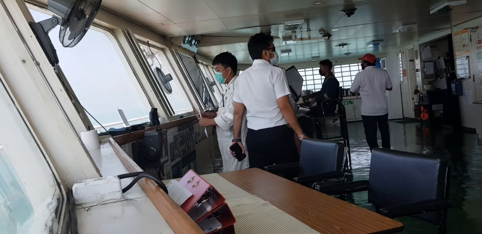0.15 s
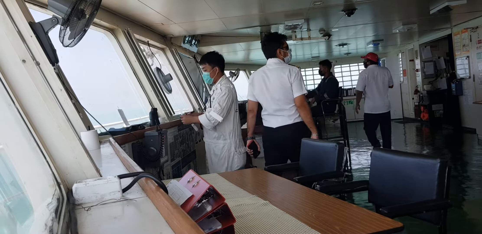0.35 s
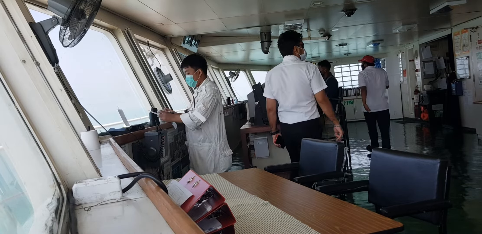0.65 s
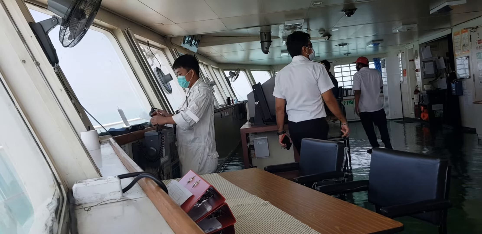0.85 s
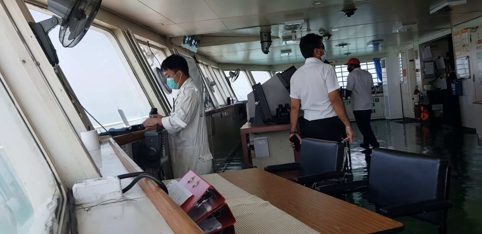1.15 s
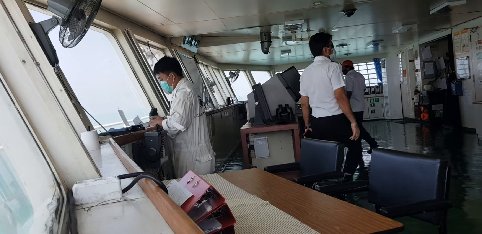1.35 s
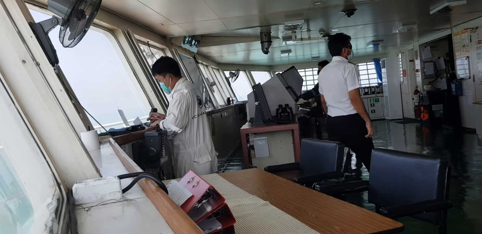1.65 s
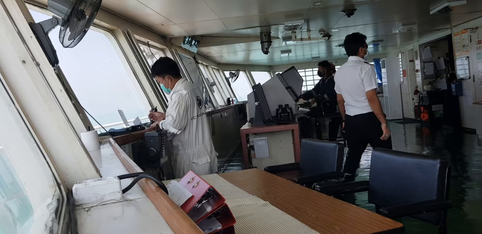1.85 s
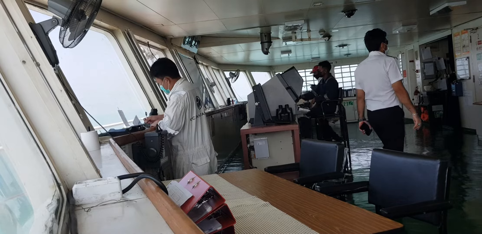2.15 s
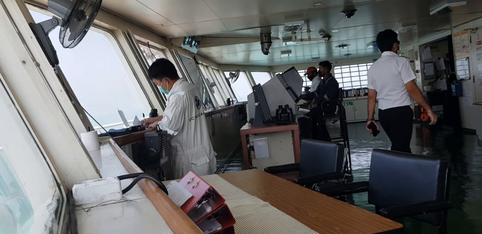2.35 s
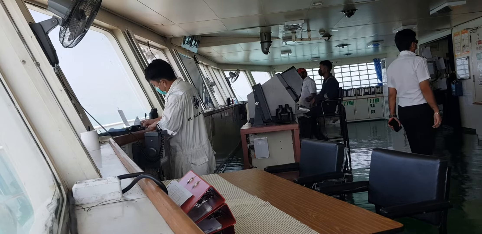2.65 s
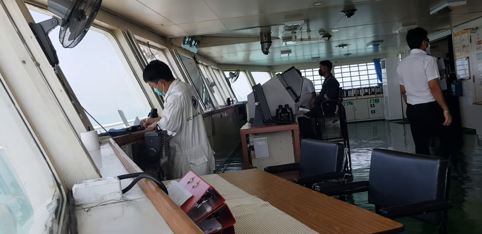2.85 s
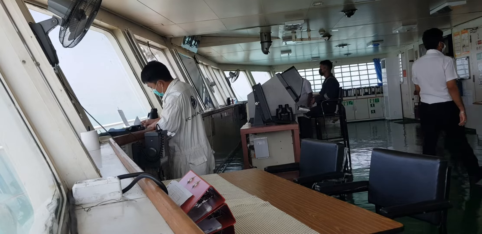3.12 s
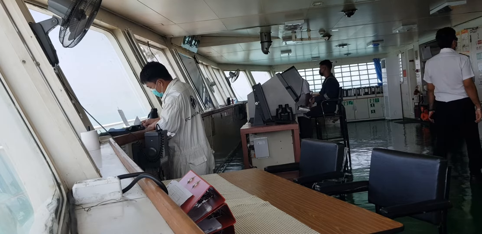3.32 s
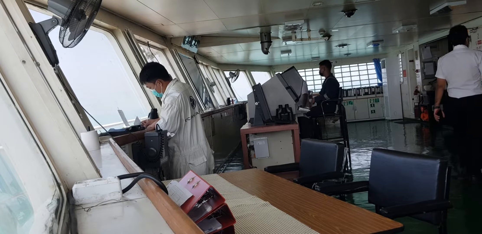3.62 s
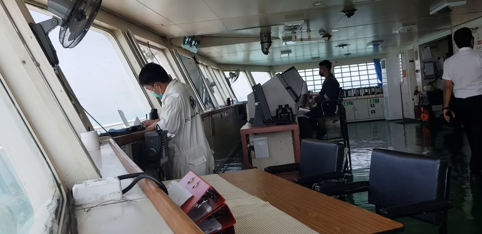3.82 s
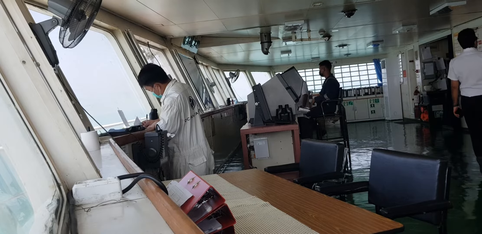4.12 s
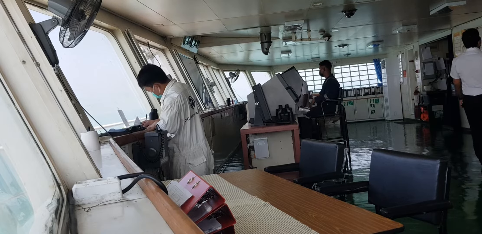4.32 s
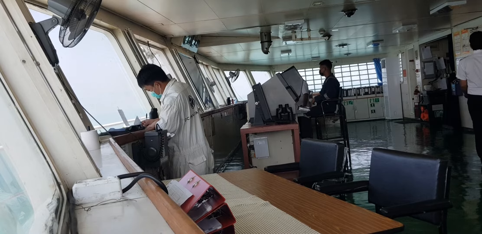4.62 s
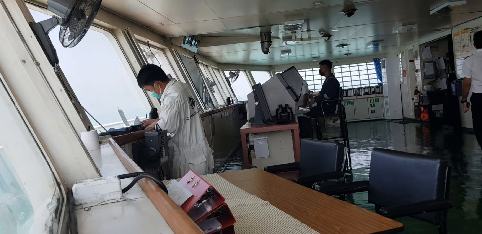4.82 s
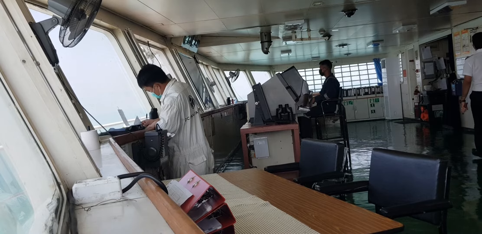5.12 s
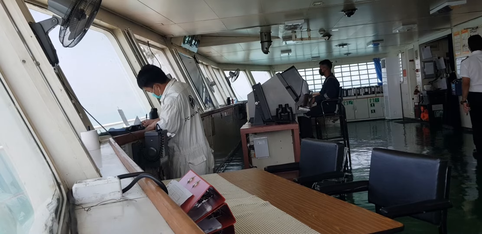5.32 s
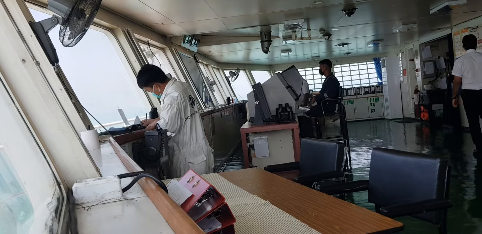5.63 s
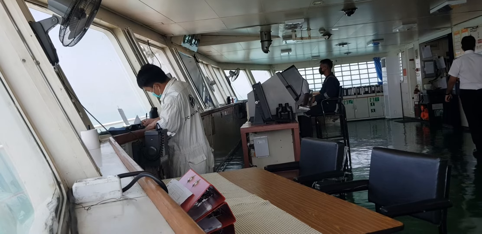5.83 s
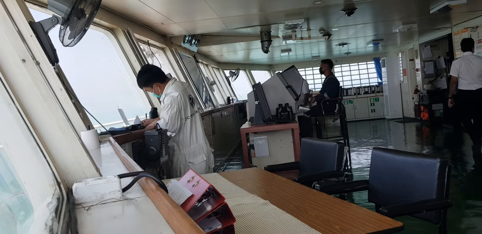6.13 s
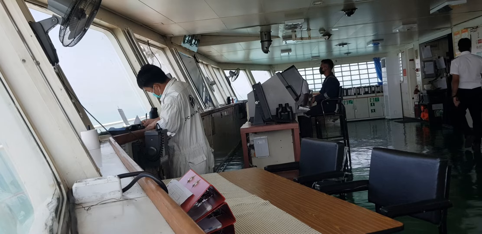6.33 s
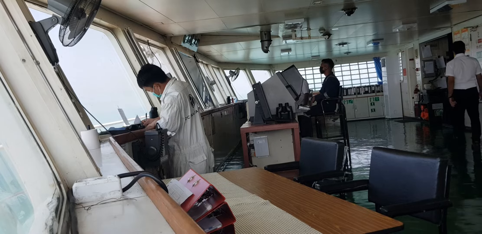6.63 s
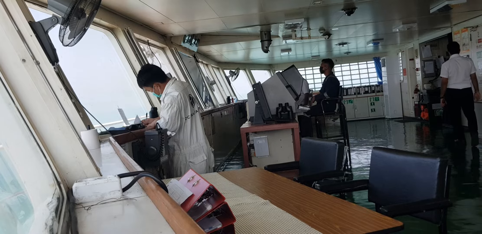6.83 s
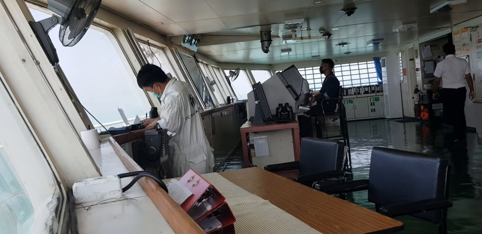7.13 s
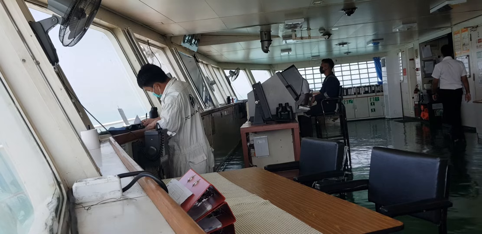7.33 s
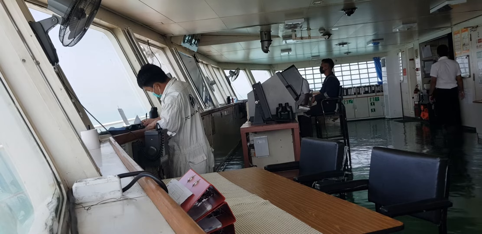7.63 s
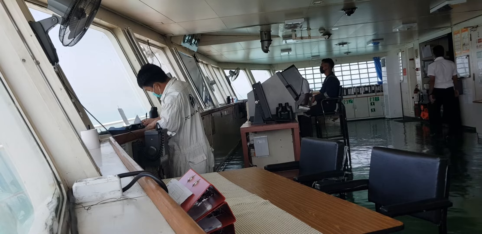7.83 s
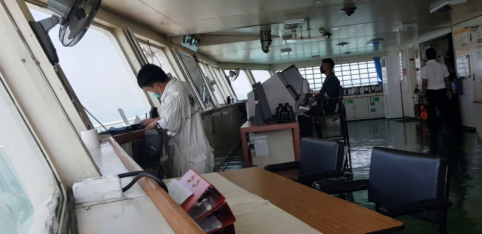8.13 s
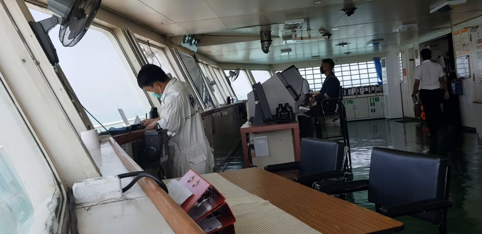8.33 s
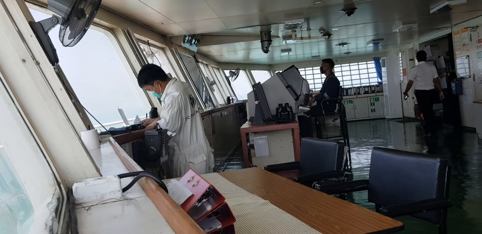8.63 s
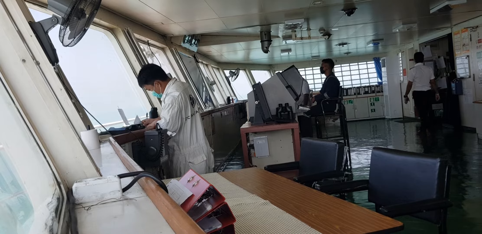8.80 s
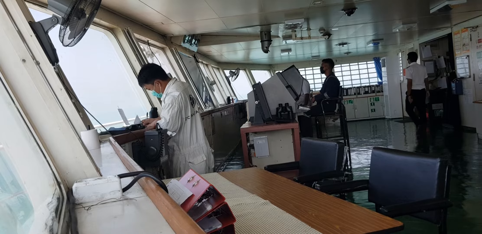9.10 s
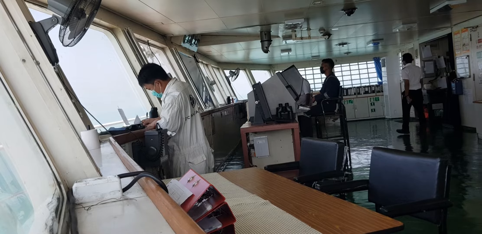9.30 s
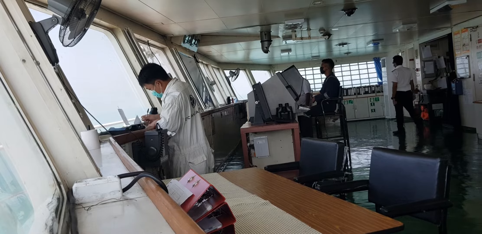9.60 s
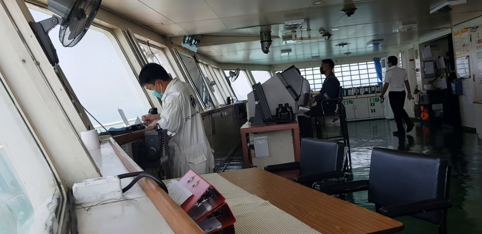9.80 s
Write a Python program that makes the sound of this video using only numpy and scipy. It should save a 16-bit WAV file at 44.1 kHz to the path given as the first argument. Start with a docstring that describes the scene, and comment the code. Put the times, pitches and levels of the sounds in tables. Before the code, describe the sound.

A ship's engine throbs low and steady through the bridge while a console motor buzzes, air hisses, and a crew member's clothes rustle away.

```python
"""A slow engine throb with knocks, at about 250 rpm over a steady rumble, fills the bridge of a ship underway.
Shaft orders locked in phase make the throb, and short bursts in the panels make the knocks.
A motor in a console buzzes and whirrs: noise modulated by its turns excites resonances of its housing.
A crew member in rustling clothes walks away with scuffing steps, made of noise under short swells.
Behind them a generator hums and a pump whistles as steady tones, and ventilation hisses as coloured noise."""
import sys
import numpy as np
from scipy import signal
from scipy.fft import rfft, irfft, next_fast_len
from scipy.io import wavfile
from scipy.ndimage import uniform_filter1d, map_coordinates

SR = 44100
rng = np.random.default_rng(int(sys.argv[2]) if len(sys.argv) > 2 else 0)


def pcm_store(signal):
    """Save signal as 16-bit PCM."""
    levels = np.round(np.clip(np.atleast_2d(signal), -1, 1) * 32767)
    wavfile.write(sys.argv[1], SR, levels.astype(np.int16).T)


N = 439236

# Speed of the main engine. Each row: time in seconds, speed in rpm.
SHAFT_SPEED = [(0, 250.25), (2.5, 249.9), (4.5, 250.3), (7, 251.6), (10, 250.3)]
# Tones at multiples of the shaft rate, as the hull passes them. Each row: multiple of the shaft rate, relative
# level in dB. The 12th, near 50 Hz, is the generator's line, here kept in step with the shaft.
ORDERS = [(6, -61), (7, -48.0), (8, -34.5), (9, -40.7), (10, -44.1), (11, -26.8), (12, -29.2), (13, -38.9),
          (14, -39.8), (15, -28.6), (16, -31.7), (17, -42.5), (19, -37.9), (20, -28.8), (22, -47.4),
          (23, -31.5), (24, -47.3), (25, -47.4), (26, -58), (27, -52.6), (28, -52.7), (31, -53.1),
          (33, -66.2), (34, -65.4), (38, -63), (41, -63), (43, -60), (46, -57.1)]
# Hard blows that set the phases of the orders. Each row: share of the turn, relative strength in dB,
# hull mode that it rings in Hz.
BLOWS = [(.148, 0, 71.2), (.609, .5, 79.8), (.858, .3, 84.6)]
HULL_WIDTH_HZ = 6.3
UNSTEADY_DB = .6  # wavering of each engine order and generator tone
# The throb swells and sinks with the engine's load.
SURGE_DB, SURGE_PERIOD_S, SURGE_CREST_S = .5, 5.1, 3.3
# Knocks of the cylinders. Each row: share of the turn, relative level in dB, panel that it shakes in Hz.
KNOCKS = [(.02, -47.5, 338), (.14, -53, 368), (.25, -44.5, 238), (.31, -52.5, 371), (.39, -46, 204),
          (.43, -47, 340), (.47, -46.5, 240), (.58, -43, 207), (.59, -50.5, 371), (.71, -50.5, 336),
          (.84, -52, 368), (.94, -42.5, 203)]
# Half-length of a knock, and the scatter of its oscillation in time and of its strength.
KNOCK_S, KNOCK_SCATTER_S, KNOCK_SCATTER_DB = .017, .0006, 1.5

TURN_HZ = 16.695  # turns of the console motor a second
# Load of the motor, used about its mean. Each row: time in seconds, load in dB.
MOTOR_LOAD = [(0, -56.5), (2.45, -57.5), (3.05, -62), (4.2, -63), (4.6, -60.5), (5.1, -66), (6.05, -62.5),
              (6.5, -63), (7.3, -60), (8.9, -61), (9.9, -62.5)]
# Registers of the motor, by name. Each row: level in dB at mean load, dB per dB of load,
# gain in dB when the drive engages.
REGISTERS = {"whirr": (-60, .05, 4.7), "drone": (-59.5, 1.3, 0), "buzz": (-64.5, 0.47, 6.65)}
ENGAGE_S, ENGAGE_RISE_S = 1.65, .2  # when the drive engages, and how long it takes
# Resonances of the housing in each register. Each row: centre in Hz, width in Hz, relative level in dB.
WHIRR_MODES = [(1108, 24, -1.5), (1160, 26, 1), (1213, 15, 1), (1245, 14, -1), (1276, 12, -2.5)]
DRONE_MODES = [(1595, 20, 1.5), (1668, 24, 1.5), (1740, 35, -4), (2245, 36, -7), (2400, 60, -17),
               (3290, 22, -9.5)]
BUZZ_MODES = [(1745, 50, 0), (1835, 50, 1), (1925, 40, -3), (2042, 22, 4.5), (2140, 50, -9)]
# Resonances of the loose part, the squeaks and the groans. Each row: centre in Hz, width in Hz,
# relative level in dB.
RATTLE_MODES = [(3080, 42, -1.5), (3195, 50, -1), (3285, 46, 1.5), (4230, 70, -11)]
SQUEAK_MODES = [(2750, 300, -10), (3130, 100, -3), (3290, 70, 0), (3550, 200, -10), (4300, 250, -16),
                (4750, 250, -16)]
GROAN_MODES = [(1240, 45, 0)]
# Level of the loose rattle. Each row: time in seconds, level in dB.
RATTLE_LEVEL = [(0, -64), (1.4, -65), (2.45, -63), (3.2, -65.5), (4.0, -66), (4.18, -73), (4.3, -66),
                (4.65, -64), (5.1, -74), (5.55, -71.5), (6, -67), (7.2, -68.5), (7.8, -66.5), (8.85, -67),
                (9.3, -74), (9.9, -71)]
# Chirring squeaks of the drive. Each row: peak time in seconds, length in seconds, level in dB.
SQUEAKS = [(1.715, .022, -50), (1.77, .035, -54), (1.83, .02, -53), (1.875, .022, -52), (1.93, .02, -56),
           (1.995, .025, -56), (2.06, .025, -53), (2.11, .03, -53.5), (2.16, .018, -57)]
# Low groans under the squeaks. Each row: peak time in seconds, length in seconds, level in dB.
GROANS = [(1.71, .04, -54), (1.785, .06, -51), (1.87, .035, -54), (2.025, .07, -51), (2.115, .05, -50)]
# Thin whines of the motor. Each row: pitch in Hz, relative level in dB, left-right difference in dB.
WHINES = [(1103, -69, 0), (1200, -72.5, 0), (1281, -75, 0), (1455, -78, 0), (1586, -68, 0), (1602, -75, 0),
          (1668, -71, -2), (2020, -71.5, -1), (2050, -68.5, 0), (2195, -78, 0)]

# Soles scuffing the deck. Each row: peak time in seconds, length in seconds, relative level in dB.
SCUFFS = [(.08, 0.054, -49), (.868, .024, -47), (1.03, .03, -53), (1.2, .016, -43), (1.243, .032, -47),
          (1.54, .05, -52.5), (2.42, .06, -50.5), (3.075, .06, -56), (9.06, .05, -54), (9.635, .03, -56),
          (9.7, .06, -57.5)]
# Swishes of sleeves. Each row: peak time in seconds, length in seconds, relative level in dB,
# fizz over the swish in dB.
SWISHES = [(.08, .02, -59, -15), (.17, .04, -60, -9), (.55, .025, -59.5, -8), (.622, .02, -53, -3),
           (.78, .05, -69, -2.5), (1.02, .04, -61.5, -5), (1.13, .08, -63.5, -5),
           (1.243, .036, -48.5, -8.5), (1.53, .06, -66, -2), (2.42, .055, -56, -17.5),
           (2.58, 0.078, -62, -7.5), (3.085, 0.077, -57.5, -10.5), (3.29, 0.078, -63, -7.5),
           (3.5, .07, -68.5, -14), (4.7, .025, -68, -9), (8.86, .07, -69, -14), (9.06, .045, -69, -20),
           (9.457, .016, -64, -10), (9.68, .09, -68, -16), (9.78, .025, -73.5, 0.5)]
# Spectra of soles, swishes, their fizz and the steady rustle. Each row: frequency in Hz,
# relative density in dB per Hz.
SCRAPE_SPECTRUM = [(200, -14), (600, 0), (1000, -5), (1250, -3), (1450, 2.5), (1700, 2), (1950, -2),
                   (2250, .5), (2900, -7), (4500, -12.5), (7000, -21), (9000, -41), (15000, -37)]
SWISH_SPECTRUM = [(500, -20), (2000, -8), (4000, -1), (6800, 0), (8800, -16), (12000, -35)]
FIZZ_SPECTRUM = [(3000, -40), (7500, -6), (11500, 0), (14000, -3), (15500, -7)]
CLOTH_SPECTRUM = [(300, -10), (1500, 3), (2500, 2), (4000, -3.5), (7000, -8), (8800, -22), (11500, -24),
                  (15500, -31)]
# The rustle fades as the wearer leaves, its top treble sooner.
CLOTH_DB, LEAVE_S, FADE_DB_PER_S = -57, 1.8, 10.5
CLOTH_FIZZ_DB, FIZZ_FADE_DB_PER_S = -75, 24.5
PATCHY_DB = 2.2  # depth of the shifting colour of all rubbing
# Trouser legs brush once a stride, harder as the walker turns round.
WALK_S, STRIDE_S, BRUSH_S, BRUSH_DB, BRUSH_FIZZ_DB = 4.04, .684, .12, -70, -14
TURN_ROUND_S, TURN_ROUND_LENGTH_S, TURN_ROUND_DB = 6.8, 0.82, 5
SWELL_SHARE = .85  # the rise of a rub over its fall
CABIN_DB, CABIN_T60_S = -4.5, 0.64  # the cabin's tail after each rub
# Small clicks. Each row: peak time in seconds, level in dB, pitch in Hz.
TICKS = [(1.643, -62, 7520), (2.772, -55.5, 3700)]
TICK_S, TICK_WIDTH = .005, .25  # their length, and their bandwidth over their pitch

# Rumble of hull and deck. Each row: frequency in Hz, relative density in dB per Hz.
RUMBLE_SPECTRUM = [(15, -23), (28, -20), (42, -1.5), (60, -4.5), (86, -3.5), (95, -7), (104, -7.5),
                   (117, -18), (135, -18), (175, -19.3), (225, -22.5), (285, -22), (330, -26), (385, -27.2),
                   (430, -28.7), (600, -41), (1200, -70), (3000, -120)]
# Likeness of left and right in the rumble and panels. Each row: frequency in Hz, correlation.
HULL_ALIKE = [(60, .995), (150, .97), (280, .9), (380, .7), (500, .05)]
# Resonances of deck and wall panels. Each row: centre in Hz, width in Hz, relative level in dB.
PANELS = [(139, 8, -40.9), (204, 7, -51), (240, 5, -52), (338, 7, -58), (371, 5, -59.5), (472, 12, -65)]
# Tones of the generator and auxiliary machines. Each row: pitch in Hz, relative level in dB.
GENERATOR_TONES = [(75.09, -28), (150.2, -53), (200.3, -54), (225.3, -58), (400.6, -65), (500.8, -71),
                   (548, -69.5), (561, -69), (600.5, -64.5)]
MAINS_HUM_HZ = 300.35
# Mains hum of the electrical gear. Each row: time in seconds, relative level in dB.
MAINS_HUM_LEVEL = [(0, -56), (1.1, -67), (1.7, -54), (2.3, -57), (3.1, -48.5), (3.9, -54), (5.2, -53),
                   (6, -58), (7.5, -56), (8.1, -67), (8.7, -53), (9.9, -51.5)]
# A pump's whistle: pitch, resting level, and the height, time and half-length of its swell.
PUMP_HZ, PUMP_DB, PUMP_SWELL_DB, PUMP_SWELL_S, PUMP_SWELL_LENGTH_S = 737, -76, 12, 7.0, 2.4
# Rush of the ventilation. Each row: frequency in Hz, relative density in dB per Hz.
AIR_SPECTRUM = [(100, -10), (350, -1), (520, -1), (650, .5), (800, -2), (950, -4.8), (1400, -11.3),
                (2200, -13.3), (2800, -19.7), (3800, -24.4), (7000, -27.7), (8500, -40), (11500, -36.5),
                (15500, -41)]
# Likeness of left and right in the air. Each row: frequency in Hz, correlation.
AIR_ALIKE = [(200, 1), (500, 0.097), (1000, 0.35), (3000, 0), (12000, -0.69)]
TOP_HZ = 15750


def amp(db):
    """Decibels to gain."""
    return 10 ** (np.asarray(db) / 20)


def unit(x):
    """Scale to rms 1."""
    return x / np.sqrt(np.mean(x ** 2) + 1e-20)


def along(points, hz):
    """Interpolate (Hz, value) points on a log axis."""
    f, v = np.transpose(points)
    return np.interp(np.log(hz + 1), np.log(f + 1), v)


def clock():
    """The time of each sample in seconds."""
    return np.arange(N) / SR


def curves(rows):
    """One value per sample for each column after the time."""
    s, *cols = np.transpose(rows)
    return [np.interp(clock(), s, c) for c in cols]


def wobble(rate):
    """A smooth random curve: a spline through random knots, rate of them a second."""
    count = int(N * rate / SR) + 4
    steps = np.linspace(0, count - 1, 20 * count)
    smooth = map_coordinates(rng.standard_normal(count), [steps])
    return np.interp(np.arange(N, dtype=float), steps * SR / rate, smooth)


def filtered(x, response):
    """Linear filtering: the spectrum of x times a response of frequency."""
    m = next_fast_len(N + SR // 2)
    return irfft(rfft(x, m) * response(np.fft.rfftfreq(m, 1 / SR)), m)[..., :N]


def ring(x, modes):
    """Resonance: x through (Hz, width, dB) peaks with steep skirts, at rms 1."""
    def response(f):
        power = sum(amp(db) ** 2 / (1 + ((f - c) / w) ** 2) ** 2 for c, w, db in modes)
        return np.sqrt(power)
    return unit(filtered(x, response))


def pair(likeness):
    """Partial correlation: white stereo noise whose sides share a part."""
    shared = np.clip(likeness, 0, 1)
    return np.sqrt(shared) * rng.standard_normal(N) + np.sqrt(1 - shared) * rng.standard_normal((2, N))


def noise(spectrum, alike):
    """Sum and difference of two noises: coloured stereo of rms 1 with the given (Hz, likeness) of sides."""
    def colour(hz):
        angle = np.arccos(np.clip(along(alike, hz), -1, 1)) / 2
        return amp(along(spectrum, hz)) * np.array([np.cos(angle), np.sin(angle)])
    mid, side = filtered(rng.standard_normal((2, N)), colour)
    return unit(np.array([mid + side, mid - side]))


def pan(left_db):
    """Gains of the two sides for a left-right level difference."""
    return amp(np.array([[left_db], [-left_db]]) / 2)


def shaft():
    """Phase is the integral of speed: turns that the main shaft has made at each sample."""
    return np.cumsum(curves(SHAFT_SPEED)[0] / 60) / SR


def engine():
    """Fourier synthesis: shaft orders, phased by hard blows on hull modes, add up to a throb every turn."""
    turns = shaft()
    shaft_hz = turns[-1] * SR / N
    out = np.zeros(N)
    for k, db in ORDERS:
        f = k * shaft_hz
        blows = 0
        for share, blow_db, hz in BLOWS:
            mode = 1j * f / (hz * hz - f * f + 1j * f * HULL_WIDTH_HZ)
            blows += amp(blow_db) * np.exp(-2j * np.pi * k * share) * mode
        level = amp(db + UNSTEADY_DB * wobble(3))
        # the blows give only the phase; the table gives the level
        out += level * np.sqrt(2) * np.cos(2 * np.pi * k * turns + np.angle(blows))
    surge_db = SURGE_DB * np.cos(2 * np.pi * (clock() - SURGE_CREST_S) / SURGE_PERIOD_S)
    return out * amp(surge_db + .2) * pan(1.2)


def knocks(level_db=-0.35):
    """Repeated excitation: cylinders knock in the same order each turn, as soft bursts at panel pitches."""
    turns, out = shaft(), np.zeros(N + SR)
    t = np.arange(-SR // 16, SR // 16) / SR
    for share, db, hz in KNOCKS:
        for s in np.interp(np.arange(share, turns[-1]), turns, clock()):
            late, louder = rng.standard_normal(2)
            swell = np.exp(-(t / KNOCK_S) ** 2)
            burst = swell * np.sin(2 * np.pi * hz * (t - KNOCK_SCATTER_S * late))
            out[round(s * SR):][:len(t)] += amp(db + KNOCK_SCATTER_DB * louder) * burst
    centred = out[len(t) // 2:][:N]
    return amp(level_db) * np.sqrt(2) * centred * pan(2.5)


def chatter(modes, repeat, pull_depth, turn_depth):
    """Forced vibration: partly periodic noise rings the housing, modulated by six magnetic pulls a turn."""
    turns = TURN_HZ * clock() + .002 * wobble(1.5)
    size = round(SR / TURN_HZ)
    position = turns % 1 * size
    one_turn = rng.standard_normal((2, size))
    same = np.array([map_coordinates(row, [position], order=1, mode="grid-wrap") for row in one_turn])
    share = np.clip(repeat, 0, 1)
    grit = np.sqrt(share) * same + np.sqrt(1 - share) * rng.standard_normal((2, N))
    rung = ring(grit, modes)
    # every turn equally hard
    even = rung / np.sqrt(np.abs(uniform_filter1d(rung ** 2, size)) + 1e-9)
    pulls = np.cos(6 * 2 * np.pi * turns)
    return unit(even * np.exp(pull_depth * pulls + turn_depth * np.cos(2 * np.pi * turns)))


def strokes(rows, tail_db=CABIN_DB):
    """Envelope of (s, length s, dB) rubs: quick swell, slower fall and exponential decay in the cabin."""
    grid = clock()[::64]
    s, length, db = np.transpose(rows)[:, :, None]
    t = grid - s
    rub = np.exp(-(t / np.where(t < 0, SWELL_SHARE * length, length)) ** 2)
    tail = (t > 0) * amp(tail_db - 60 * np.abs(t) / CABIN_T60_S)
    return np.interp(clock(), grid, np.sum(amp(db) * np.maximum(rub, tail), axis=0))


def motor():
    """Load-dependent radiation: three registers share one load; a part rattles, the drive squeaks and groans."""
    load, = curves(MOTOR_LOAD)
    load_db = load - load.mean()
    engaged = np.clip((clock() - ENGAGE_S) / ENGAGE_RISE_S, 0, 1)
    level = {}
    for name, (db, follows, step_db) in REGISTERS.items():
        level[name] = amp(db + follows * load_db + step_db * engaged)
    whirr = level["whirr"] * chatter(WHIRR_MODES, repeat=0.43, pull_depth=0.11, turn_depth=0.049) * pan(.5)
    drone = level["drone"] * chatter(DRONE_MODES, repeat=0.33, pull_depth=0.13, turn_depth=0.16) * pan(-0.97)
    buzz = level["buzz"] * chatter(BUZZ_MODES, repeat=0.22, pull_depth=.2, turn_depth=0.2) * pan(-2.3)
    trill = chatter(RATTLE_MODES, repeat=.4, pull_depth=.5, turn_depth=.27)
    rattle = amp(curves(RATTLE_LEVEL)[0]) * trill * pan(-3.5)
    chirr = chatter(SQUEAK_MODES, repeat=.5, pull_depth=.4, turn_depth=0)
    squeak = strokes(SQUEAKS, tail_db=-13.5) * chirr * pan(-1)
    moan = chatter(GROAN_MODES, repeat=0.69, pull_depth=.2, turn_depth=.05)
    groan = strokes(GROANS, tail_db=-15.5) * moan
    return whirr + drone + buzz + rattle + squeak + groan


def whine(drift=0.54):
    """Multipath: thin motor tones reach each side by many paths, so they waver on their own."""
    def side(hz):
        phase = 2 * np.pi * (hz * clock() + rng.random()) + drift * wobble(7)
        return amp(2.9 * wobble(3.6)) * np.sin(phase)
    tones = sum(amp(db) * pan(left_db) * np.array([side(hz), side(hz)]) for hz, db, left_db in WHINES)
    return np.sqrt(2) * tones


def strides(count=8):
    """Periodic gait: even brushes of cloth, strongest on turning round: (s, length s, dB, fizz dB)."""
    times = WALK_S + STRIDE_S * np.arange(count)
    turning = np.exp(-((times - TURN_ROUND_S) / TURN_ROUND_LENGTH_S) ** 2)
    levels = BRUSH_DB + TURN_ROUND_DB * turning
    return [(s, BRUSH_S, db, BRUSH_FIZZ_DB) for s, db in zip(times, levels)]


def patchy(x, depth_db=PATCHY_DB):
    """Uneven friction: folds and treads catch, so the colour of the rubbing shifts from moment to moment."""
    z = signal.stft(x, nperseg=256)[2]
    across_hz = uniform_filter1d(rng.standard_normal(z.shape[1:]), size=9, axis=0)
    field = uniform_filter1d(across_hz, size=7, axis=1)
    return unit(signal.istft(z * amp(depth_db * unit(field)), nperseg=256)[1][:, :N])


def walker(grain_db=0.5, uneven_db=0.65):
    """Friction noise: soles scuff, sleeves and legs swish, and a rustle fades, all grainy and uneven."""
    rubs = list(SWISHES) + strides()
    soles = strokes(SCUFFS) * patchy(noise(SCRAPE_SPECTRUM, [(1000, 0.13)]))
    swish_level = strokes([(s, length, db) for s, length, db, _ in rubs])
    swish = swish_level * patchy(noise(SWISH_SPECTRUM, [(5000, 0.084)]))
    away_s = np.maximum(clock() - LEAVE_S, 0)
    rub_fizz = strokes([(s, length, db + fizz_db) for s, length, db, fizz_db in rubs])
    sheen = np.hypot(rub_fizz, amp(CLOTH_FIZZ_DB - FIZZ_FADE_DB_PER_S * away_s))
    fizz = sheen * patchy(noise(FIZZ_SPECTRUM, [(5000, 0.16)])) * pan(2.3)
    cloth_level = amp(CLOTH_DB - FADE_DB_PER_S * away_s + 0.73 * wobble(12))
    cloth = cloth_level * patchy(noise(CLOTH_SPECTRUM, [(3000, 0.15)])) * pan(.5)
    grain = unit(amp(grain_db * wobble(400) + uneven_db * wobble(45)))
    return (soles + swish + fizz + cloth) * grain


def ticks():
    """Short broad resonances: small things click here and there, each in its own register."""
    out = 0
    for s, db, hz in TICKS:
        click = ring(pair(.3), [(hz, TICK_WIDTH * hz, 0)])
        out = out + strokes([(s, TICK_S, db)], tail_db=-9.5) * click
    return out


def hull():
    """Random excitation: propeller wash and sea shake the hull; resonant deck and wall panels drone along."""
    rumble = amp(-34.3) * noise(RUMBLE_SPECTRUM, HULL_ALIKE)
    panels = sum(amp(db) * ring(pair(along(HULL_ALIKE, hz)), [(hz, width, 0)]) for hz, width, db in PANELS)
    return rumble * pan(0.98) + amp(0.56) * panels * pan(2.8)


def generator():
    """Governed rotation: steady tones, the higher wavering more in phase, beside a swelling mains hum."""
    tones = np.zeros(N)
    for hz, db in GENERATOR_TONES:
        phase = 2 * np.pi * hz * clock() + hz / 900 * wobble(1.5)
        tones += amp(db + UNSTEADY_DB * wobble(2)) * np.cos(phase)
    mains_phase = 2 * np.pi * MAINS_HUM_HZ * clock() + .2 * wobble(1.5)
    mains = amp(curves(MAINS_HUM_LEVEL)[0]) * np.cos(mains_phase)
    return np.sqrt(2) * (tones + mains) * pan(1.8)


def pump():
    """A slowly modulated pure tone: the whistle swells, holds for a few seconds and sinks back."""
    swell = np.exp(-((clock() - PUMP_SWELL_S) / PUMP_SWELL_LENGTH_S) ** 4)
    level = amp(PUMP_DB + PUMP_SWELL_DB * swell + wobble(2))
    phase = 2 * np.pi * PUMP_HZ * clock() + .3 * wobble(1.5)
    return np.sqrt(2) * level * np.sin(phase) * pan(0.99)


def ventilation():
    """Flow noise: a steady broadband rush of air in the wheelhouse."""
    return amp(-51.0 + 0.38 * wobble(4.4)) * noise(AIR_SPECTRUM, AIR_ALIKE)


def scene():
    """Superposition of everything that is heard on the bridge."""
    machines = engine() + knocks() + motor() + whine()
    crew = walker() + ticks()
    background = hull() + generator() + pump() + ventilation()
    return machines + crew + background


def record(dry):
    """Band limitation: nothing remains at or above the top frequency."""
    return filtered(dry, lambda hz: hz < TOP_HZ)


dry = scene()
out = record(dry)
pcm_store(out)
```